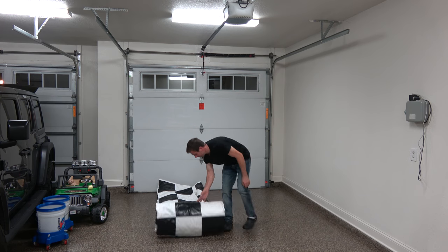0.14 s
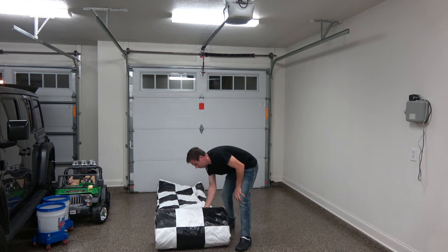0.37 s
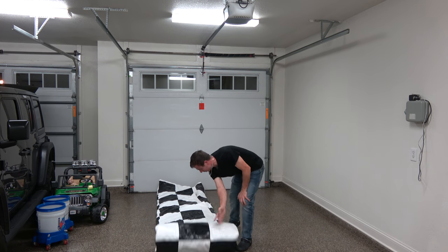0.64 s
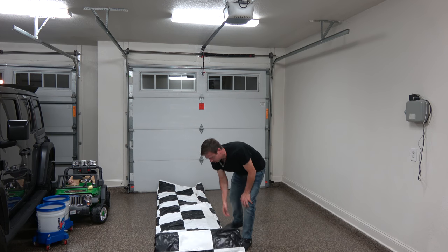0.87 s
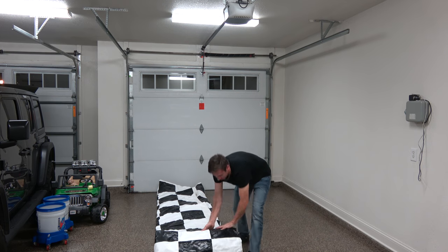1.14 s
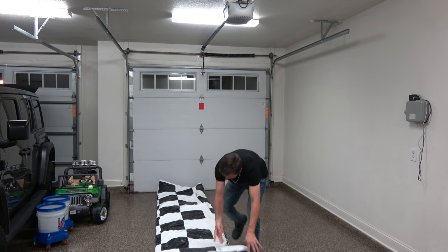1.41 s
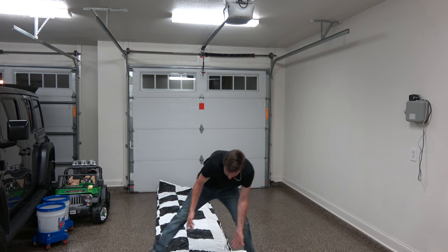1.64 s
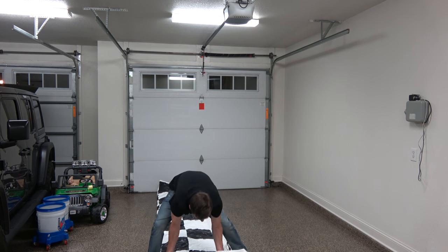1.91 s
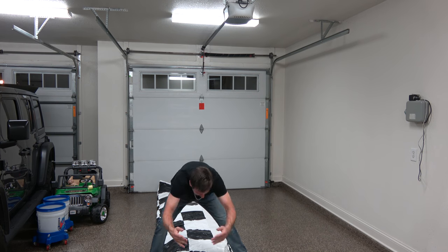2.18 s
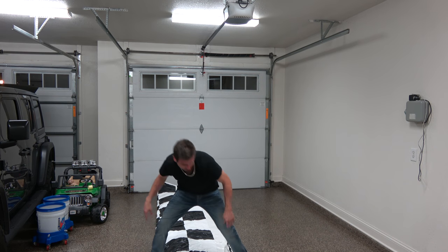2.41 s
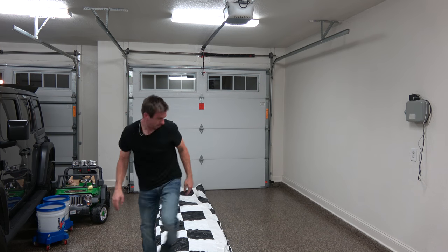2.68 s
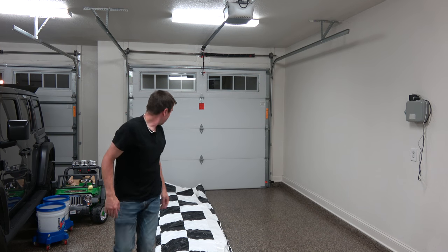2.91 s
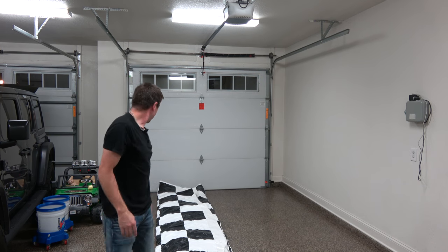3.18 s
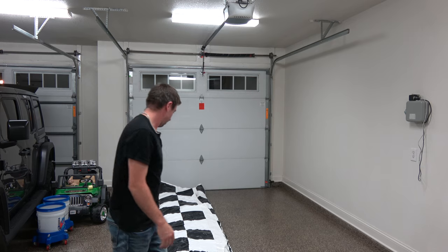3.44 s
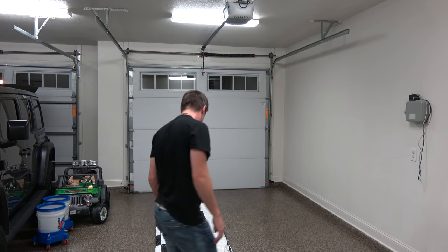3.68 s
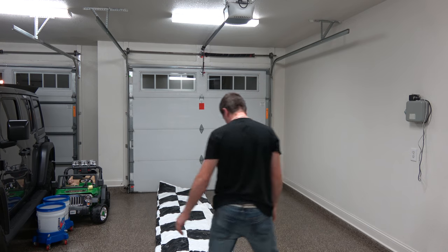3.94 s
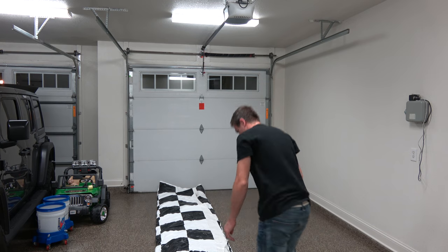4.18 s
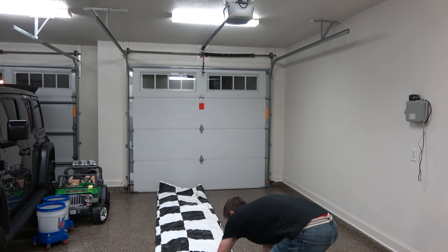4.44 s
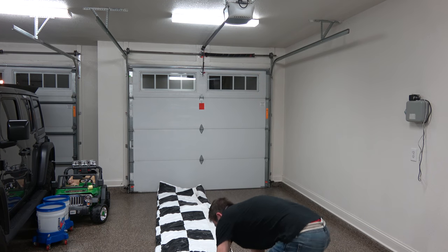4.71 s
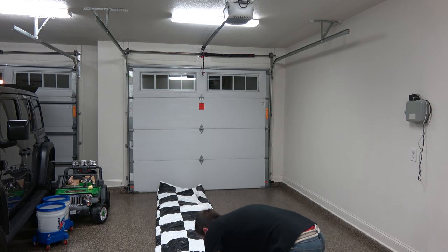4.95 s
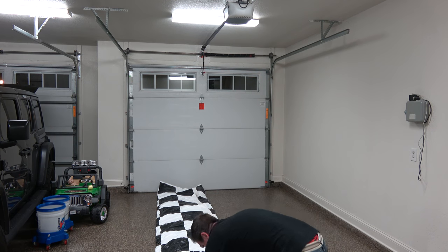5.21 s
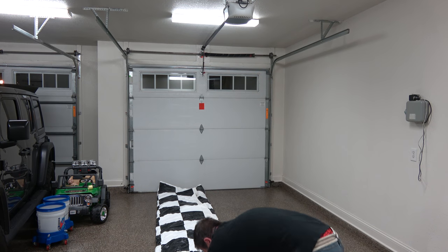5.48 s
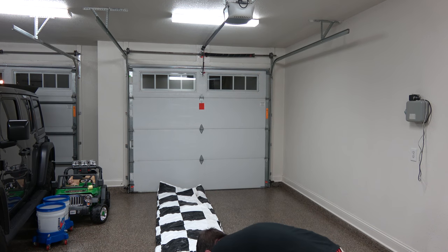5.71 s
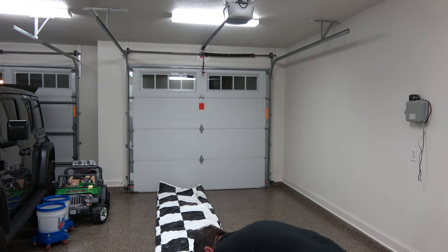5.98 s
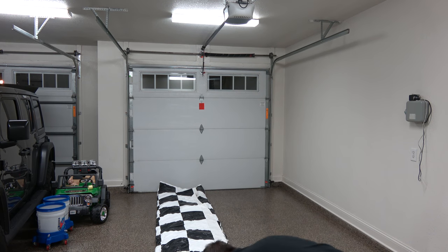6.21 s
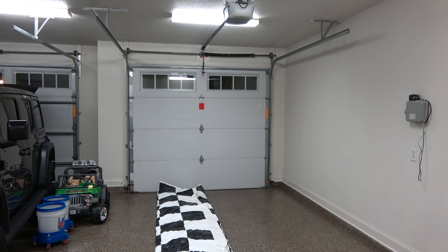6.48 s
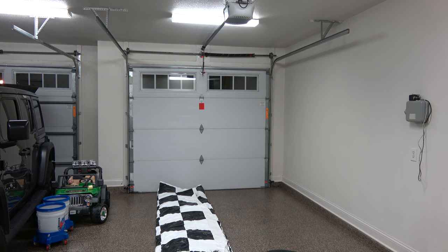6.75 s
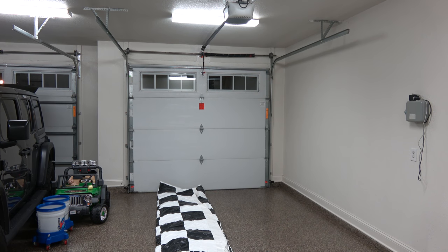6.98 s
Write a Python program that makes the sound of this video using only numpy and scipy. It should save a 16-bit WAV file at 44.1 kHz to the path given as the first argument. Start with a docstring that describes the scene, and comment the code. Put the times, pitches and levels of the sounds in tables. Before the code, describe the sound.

In a bare, reverberant garage, a heavy plastic roll opens in irregular loud bursts of crunch, flapping and crackle. After two seconds it drops to light steps, small ticks and barely audible rustling. Past four seconds the sheet is tugged and straightened closer by, with dense crinkling and even sharper cracks until the cut. A single stationary microphone hears everything centered, over quiet rumble and hiss.

```python
"""A thick folded plastic sheet is unrolled over a concrete garage floor, above a low rumble and a faint hiss.
For two seconds hard pulls buckle big folds with a dull crunch, crackle small creases and snap stiff folds.
Two quieter seconds follow, with shoes thudding, scuffing and ticking; then strong pulls go on to the end.
Crunch and crackle are thousands of short rings; snaps, ticks and thuds are a dying ring with dying noise.
The bare garage answers with fading noise; one microphone hears it all, with a soft ceiling on the peaks."""
import sys
import numpy as np
from scipy import signal
from scipy.fft import rfft, irfft, next_fast_len
from scipy.io import wavfile
from scipy.ndimage import map_coordinates

SR = 44100
rng = np.random.default_rng(int(sys.argv[2]) if len(sys.argv) > 2 else 0)


def volts(x):
    """Linear amplitude factor 10**(x/20) for a level x in dB, scalar or array-like."""
    e = np.asarray(x, float) / 20
    return 10 ** e


def output_pcm(signal):
    """Save a mono or channel-first signal as 16-bit PCM at the path in sys.argv[1].

    Samples are clipped to [-1, 1] before scaling.
    """
    pcm = np.clip(np.atleast_2d(signal).T, -1, 1) * 32767
    wavfile.write(sys.argv[1], SR, np.round(pcm).astype(np.int16))


N = 313806  # length in samples


def unit(x):
    """Scale to rms 1."""
    return x / np.sqrt(np.mean(x ** 2) + 1e-20)


def along(points, hz):
    """Read (Hz, value) points at any frequency, on a log axis."""
    f, v = np.transpose(points)
    return np.interp(np.log(hz + 1e-9), np.log(f), v)


def curves(rows):
    """One value per sample for each column after the time."""
    s, *cols = np.transpose(rows)
    return [np.interp(np.arange(N) / SR, s, c) for c in cols]


def wobble(rate):
    """A smooth random curve through `rate` random points a second (200 at most)."""
    points = rng.standard_normal(int(N * 200 / SR) + 4)
    return map_coordinates(points, [np.arange(N) * rate / SR])


def noise(spectrum):
    """Noise of rms 1 with this spectrum, silent an octave or more outside it."""
    hz = np.fft.rfftfreq(N, 1 / SR)
    inside = (hz > spectrum[0][0] / 2) * (hz < spectrum[-1][0] * 2)
    gain = volts(along(spectrum, hz)) * inside
    return unit(irfft(rfft(rng.standard_normal(N)) * gain, N))


def filtered(x, response):
    """x times a response of frequency."""
    m = next_fast_len(N + SR // 2)
    hz = np.fft.rfftfreq(m, 1 / SR)
    return irfft(rfft(x, m) * response(hz), m)[..., :N]


def resonance(f, hz, width):
    """Response of one thing that likes to ring at hz; a wider resonance dies sooner."""
    return 1j * f * width / (hz * hz - f * f + 1j * f * width)


# How loud the rumble is over time. Each row: time in seconds, level in dB.
RUMBLE_LEVEL = [(0.0, -36), (.4, -48), (.85, -44), (1.2, -46), (1.45, -49), (2.0, -46.5), (2.6, -43),
                (3.35, -48.5), (3.65, -45), (3.9, -50), (4.45, -37.5), (5.0, -46), (5.6, -45), (6.3, -48),
                (6.7, -48), (7.12, -56)]
# Tone of the rumble. Each row: frequency in Hz, relative strength in dB per Hz.
RUMBLE_SPECTRUM = [(20, -0.5), (40, 2), (90, 3.5), (170, -1), (300, -13.5), (500, -19)]
# Tone of the still air and the microphone. Each row: frequency in Hz, relative strength in dB per Hz.
HISS_SPECTRUM = [(200, -0.5), (1000, -9), (3000, -11.5), (6400, -17), (16000, -24)]


def background():
    """Low rumble through the building, slowly wavering, over a faint steady hiss."""
    rumble_db, = curves(RUMBLE_LEVEL)
    rumble = volts(rumble_db + 1.2 * wobble(1.54)) * noise(RUMBLE_SPECTRUM)
    return rumble + volts(-46) * noise(HISS_SPECTRUM)


# Tugs at the sheet and brushes of a shoe against it.
# Each row: start in seconds, rise in seconds, hold in seconds, level in dB, tautness in dB.
TUGS = [(0.0, 0.0017, 0.12, -33, -2), (0.065, 0.068, .06, -27, 1.5), (.15, 0.082, 0.045, -12, -0.5),
        (0.269, 0.025, .04, -14, 0), (0.325, 0.025, 0.12, -21, 0.5), (0.509, 0.024, 0.14, -18.5, -0.5),
        (0.576, 0.027, 0.042, -25.5, 2), (0.632, 0.07, 0.035, -14.5, 0.5), (0.704, 0.052, 0.027, -11, 0),
        (0.793, 0.024, 0.068, -19.5, 1), (.89, .03, 0.065, -26, 1.5), (0.997, 0.026, 0.13, -34, 1.5),
        (1.178, 0.02, 0.047, -26, 2), (1.317, 0.041, 0.11, -25, 0.5), (1.382, 0.039, 0.059, -15, 0),
        (1.448, 0.044, 0.089, -12.5, 0), (1.622, .03, 0.077, -28, 1), (1.736, .015, 0.029, -18, 2),
        (1.947, 0.012, 0.11, -29.5, 0), (2.041, 0.076, .06, -11, 0), (2.154, .03, 0.064, -14, 2),
        (2.3, 0.027, 0.017, -27.5, -7), (2.516, 0.038, 0.044, -40.5, -0.5), (2.66, 0.027, 0.037, -49, -1),
        (2.767, 0.016, 0.079, -44, 3), (2.861, .01, 0.036, -36, 3), (2.97, 0.016, 0.03, -41, 2.5),
        (3.06, 0.016, 0.037, -43, 0), (3.143, .02, 0.042, -41.5, 0), (3.216, .03, 0.086, -39.5, 0.5),
        (3.364, 0.016, 0.064, -42.5, 1.5), (3.555, 0.044, 0.11, -38, 0.5), (3.74, .02, 0.066, -53, -6),
        (3.91, .01, 0.079, -39.5, 1), (4, .003, 0.032, -32.5, 0), (4.203, 0.0074, 0.028, -25, 1),
        (4.24, 0.015, 0.081, -35, 2.5), (4.439, .002, 0.067, -21.5, 2.5), (4.485, 0.052, 0.047, -16.5, 0.5),
        (4.564, .01, 0.065, -12, -1.5), (4.635, 0.032, 0.041, -11.5, -1), (4.79, 0.023, 0.022, -17.5, -4),
        (4.816, 0.014, 0.1, -11.5, 1), (4.906, 0.031, 0.11, -14.5, 1.5), (5.075, 0.039, 0.095, -17, 2),
        (5.238, 0.056, 0.13, -11.5, 1), (5.415, .02, 0.062, -21.5, 6), (5.517, 0.027, 0.077, -28, 2.5),
        (5.633, 0.038, 0.025, -13, 2), (5.687, 0.025, 0.085, -12.5, 1), (5.897, 0.037, 0.032, -11.5, 2),
        (5.963, 0.034, 0.049, -12.5, 2), (6.107, .01, 0.045, -23, 4.5), (6.16, .02, .03, -28, -6),
        (6.242, 0.057, 0.061, -14, 1), (6.363, 0.036, 0.079, -18.5, 1.5), (6.444, .02, .04, -22.5, 5),
        (6.565, .03, 0.03, -20, 0.5), (6.605, 0.056, 0.046, -11.5, 1), (6.787, 0.044, 0.095, -29.5, 0.5),
        (6.915, .04, 0.044, -17, 1.5), (6.975, 0.027, 0.072, -16, 2)]
# How each size follows a tug; the rows are big folds, middle folds, small creases, flap.
# Each row: offset from the tug in dB, dB per dB of tautness, extra dB per second as the tug goes on.
SIZES = [(0, -0.61, -11.5), (-3.5, 0.53, -4), (-8.5, 2.15, 2), (-24.5, 3.5, -15)]
# The whole sheet flaps over. Each row: time of the peak in seconds, peak level in dB.
FLAPS = [(.22, -16), (.47, -22), (.77, -14.5), (1.07, -52), (1.21, -20), (1.51, -24), (2.1, -18),
         (2.25, -19.5), (2.48, -27.5), (2.8, -36), (3.65, -25), (4.02, -31), (4.28, -31), (4.475, -20.5),
         (4.7, -15), (4.84, -18), (5.03, -18.5), (5.27, -31), (5.55, -31), (5.75, -17.5), (5.94, -21),
         (6.28, -37), (6.46, -19), (6.64, -19), (6.96, -22)]


def tugs():
    """Every tug rises, holds and lets go; overlapping tugs add in power. Gives levels and tautness."""
    rise_db = 14  # climb for each tenfold of time in the rise
    let_go_db_per_s, flap_up_db_per_s, flap_down_db_per_s = 225, 320, 303
    power, taut = np.full((len(SIZES), N), 1e-9), np.zeros(N)
    since_start = np.arange(SR // 2) / SR
    offset_db, per_taut, gain_db_per_s = np.transpose(SIZES)[:, :, None]
    for s, rise, hold, db, taut_db in TUGS:
        i = round(s * SR)
        u = since_start[:N - i]
        climb_db = rise_db * np.log10(np.clip(u / (rise + .002), 1e-3, 1))  # every rise is 2 ms longer
        fall_db = let_go_db_per_s * np.clip(u - (rise + hold), 0, None)
        shape_db = db + climb_db - fall_db
        each = volts(shape_db + offset_db + per_taut * taut_db + gain_db_per_s * u) ** 2
        power[:, i:i + len(u)] += each
        taut[i:i + len(u)] += taut_db * each[1]
    t = np.arange(N) / SR
    for s, db in FLAPS:
        away_db = np.maximum(flap_up_db_per_s * (s - t), flap_down_db_per_s * (t - s))
        power[3] += volts(db - away_db) ** 2
    return np.sqrt(power), taut / power[1]  # tautness is averaged by middle-fold power


def buckling(spectrum, count, size, cycles, spread_db, clump_db, pitch_hz=None):
    """Facets of random width flip in or out, each a short ring at its own pitch.

    size is the ring in samples, cycles how many turns it lasts; a positive spread_db makes few large.
    With pitch_hz the spectrum holds multiples of that moving pitch."""
    when, which, big, way = rng.random((4, count))
    start = (when * N).astype(int)
    hz = spectrum[0][0] * (spectrum[-1][0] / spectrum[0][0]) ** which
    size_db = -spread_db * np.log(big + .01)
    level = volts(along(spectrum, hz) + size_db + clump_db[start])
    level = level * hz * np.sign(way - .5)  # high rings are shorter, so they start stronger
    ring_hz = hz if pitch_hz is None else hz * pitch_hz[start]
    turns = ring_hz[:, None] * np.arange(size) / SR
    fade = np.exp(-turns / cycles) * np.hanning(2 * size)[size:]
    rings = level[:, None] * np.sin(2 * np.pi * turns) * fade
    places = start[:, None] + np.arange(size)
    return unit(np.bincount(places.ravel(), rings.ravel())[:N])


# Tone of the big folds. Each row: frequency in Hz, relative strength in dB per Hz.
FOLDS = [(300, -23), (500, -3.5), (700, 0.5), (1200, -0.5), (1800, -4.5), (2500, -14.5)]
# Tone of the middle folds. Each row: multiple of their moving pitch, relative strength in dB per Hz.
MIDDLE = [(.55, -9), (.8, -4.5), (1, -4), (1.3, -6), (1.9, -14.5)]
# Tone of the small creases. Each row: frequency in Hz, relative strength in dB per Hz.
CREASES = [(3500, -4), (5000, -1.5), (8000, -8), (11000, -7.5), (13500, -23), (17000, -12)]
# Tone of the flapping sheet. Each row: frequency in Hz, relative strength in dB per Hz.
FLAP = [(150, -22), (260, 18), (400, 9.5), (600, 7.5)]


def sheet():
    """Four sizes of buckling follow the tugs; one flip sets off others, so all share the same clumps."""
    (fold_gain, middle_gain, crease_gain, flap_gain), taut_db = tugs()
    taut_hz = 2383 + 67 * taut_db  # middle folds ring higher when the sheet is taut
    clump_db = .7 * wobble(40) + 1.6 * wobble(190)
    folds = buckling(FOLDS, count=20000, size=200, cycles=0.9, spread_db=1.5, clump_db=clump_db)
    middle = buckling(MIDDLE, count=30000, size=80, cycles=2.5, spread_db=3.0, clump_db=clump_db,
                      pitch_hz=taut_hz)
    creases = buckling(CREASES, count=60000, size=40, cycles=0.98, spread_db=-2.0, clump_db=clump_db)
    flap = buckling(FLAP, count=6000, size=600, cycles=1.3, spread_db=1.5, clump_db=clump_db)
    return fold_gain * folds + middle_gain * middle + crease_gain * creases + flap_gain * flap


# Stiff folds letting go, and in the quiet middle the scuffs and ticks of shoes on the sheet.
# Each row: time in seconds, crack level in dB, pitch in Hz, rattle level in dB, fizz level in dB.
SNAPS_AND_TICKS = [(.061, -26, 12000, -36, -31), (0.116, -18, 1500, -15, -46), (.154, -20, 12500, -28, -24),
                   (0.176, -5, 2200, -11, -39), (0.198, 0, 1240, -8, -39), (.393, -8, 681, -18, -15.5),
                   (.468, -11, 5970, -27, -34), (0.509, -16, 1400, -12.5, -43),
                   (0.605, -1, 1520, -9.5, -38), (.677, -8, 1480, -9.5, -29),
                   (1.128, -18, 2600, -24.5, -39), (1.187, -19, 397, -21.5, -35),
                   (1.209, -8, 515, -29, -38), (1.406, -8, 1020, -9.5, -38), (1.448, -1, 1380, -15, -32),
                   (1.453, -4, 880, -19, -27), (1.474, -5, 890, -24, -10.5), (1.497, -3, 1280, -9, -20),
                   (1.57, -3, 1840, -20, -35), (1.67, -8.5, 610, -28, -38), (1.753, -4, 1130, -24, -44),
                   (1.776, -10, 7500, -13.5, -28), (2.071, -20, 920, -20, -32), (2.345, -8, 1180, -41, -51),
                   (2.541, -36, 8000, -44, -49), (2.599, -30, 832, -34, -54),
                   (2.691, -27, 1850, -36.5, -58), (2.788, -23, 328, -44, -41),
                   (2.871, -18, 1400, -28.5, -46), (2.883, -11, 1400, -31, -44),
                   (3.085, -27, 800, -37, -56), (3.153, -30, 5200, -37, -48), (3.236, -21, 2620, -35, -41),
                   (3.292, -17, 1420, -40, -49), (3.447, -20, 1380, -31, -56), (3.602, -33, 573, -29, -46),
                   (3.678, -12.5, 1820, -27, -56), (3.916, -33, 730, -30.5, -51),
                   (4.005, -27, 1910, -30, -46), (4.207, -6, 2220, -27, -48), (4.446, -14, 907, -15, -18.5),
                   (4.569, -12, 885, -5.5, -38), (4.825, -21, 856, -6.5, -21), (5.131, -7, 3570, -10, -23),
                   (5.161, 4.5, 2360, -25, -28), (5.269, -11, 804, -17, -19), (5.435, 3, 3200, -7, -20),
                   (5.449, -4, 2920, -9, -23), (5.488, -6, 1320, -11.5, -17), (5.55, -16, 480, -11, -36),
                   (5.564, 0.5, 1050, -15, -33), (5.646, -7.5, 890, -13.5, -17),
                   (5.658, -1, 3060, -12.5, -17), (5.687, -8, 3200, -18, -26), (5.919, -1, 1440, -12, -28),
                   (6.102, 0, 686, -20, -15), (6.107, 10, 3150, -9.5, -18), (6.139, -11, 660, -17, -19),
                   (6.175, 0, 1970, -18, -24), (6.482, -10, 6500, -10, -26), (6.494, -12, 7960, -16, -30),
                   (6.549, -1, 1450, -24, -22), (6.577, -7, 694, -18, -34), (6.627, -9, 1370, -23, -17),
                   (6.938, -14, 1130, -19.5, -27), (6.958, -8, 4500, -17, -30)]
# Tone of the fizz on top of each. Each row: frequency in Hz, relative strength in dB per Hz.
FIZZ = [(3500, -7), (5000, 0), (9000, -4), (13000, -12), (17000, -14)]


def snaps_and_ticks():
    """A fold or a shoe cracks in one short ring; a dying rattle follows around that pitch, with a fizz on top."""
    rattle_t60_s, fizz_t60_s, attack_s = 0.095, 0.074, .001  # t60: time to fade by 60 dB
    out, t = np.zeros(N + SR), np.arange(SR // 4) / SR
    f = np.fft.rfftfreq(len(t), 1 / SR)
    for s, crack_db, hz, rattle_db, fizz_db in SNAPS_AND_TICKS:
        white = rfft(rng.standard_normal((2, len(t))))
        rattle = unit(irfft(white[0] * resonance(f, hz, 0.7 * hz + 300) ** 2, len(t)))
        fizz = unit(irfft(white[1] * volts(along(FIZZ, f)) * (f > FIZZ[0][0]), len(t)))
        crack = np.sin(2 * np.pi * hz * t) * np.exp(-hz * t / 1.2)
        dying_rattle = volts(rattle_db - 60 * t / rattle_t60_s) * rattle
        dying_fizz = volts(fizz_db - 60 * t / fizz_t60_s) * fizz
        followers = (1 - np.exp(-t / attack_s)) * (dying_rattle + dying_fizz)
        out[round(s * SR):][:len(t)] += volts(crack_db) * crack + followers
    return out[:N]


# Shoes and the roll landing on concrete.
# Each row: time in seconds, relative level in dB, pitch in Hz that the sinking push is reckoned from.
THUDS = [(0.09, -27, 144), (0.741, -23, 147.5), (1.045, -24, 73.3), (1.751, -23.5, 112), (2.432, -18, 151),
         (2.687, -37, 125), (2.773, -32, 208), (3.0, -34, 118), (3.039, -26.5, 72), (3.111, -34, 44.6),
         (3.584, -37, 153), (3.623, -17.5, 93.5), (3.631, -32, 265), (3.671, -23, 64.6), (3.799, -29.5, 44),
         (4.029, -36, 41), (4.298, -33, 83), (4.447, -27, 165), (5.53, -33, 46), (6.017, -27.5, 170),
         (6.25, -24.5, 74.4), (6.9, -39, 85), (7.039, -31, 75), (7.071, -21, 130), (7.09, -24, 107)]
# Standing waves of the garage. Each row: frequency in Hz, width in Hz, relative level in dB.
AIR_MODES = [(35.7, 4.5, 9), (53.2, 5.8, 4), (92.6, 5.7, -12), (120.6, 6.5, 1.5), (149, 8, -3),
             (265, 7.7, -9)]


def thuds():
    """A soft blow on concrete: a sinking low push and a dull puff set the garage's standing waves humming."""
    thud_t60_s, attack_s = 0.29, 0.0023
    out, t = np.zeros(N + SR), np.arange(SR // 2) / SR
    f = np.fft.rfftfreq(len(t), 1 / SR)
    for s, db, hz in THUDS:
        # the pitch sinks from 1.09 to 0.75 times hz
        turns = hz * (.75 * t + 0.296 * 0.068 * (1 - np.exp(-t / 0.06)))
        white = rfft(rng.standard_normal(len(t)))
        puff = unit(irfft(white * resonance(f, 1.07 * hz, 1.4 * hz) ** 2, len(t)))
        push = np.sin(2 * np.pi * turns)
        blow = push + volts(-60 * t / 0.42) * puff  # the puff dies sooner than the push
        level = volts(db - 9.5 - 60 * t / thud_t60_s) * (1 - np.exp(-t / attack_s))
        out[round(s * SR):][:len(t)] += level * blow
    blows = out[:N]
    hum = filtered(blows, lambda f: sum(volts(db) * resonance(f, hz, w) for hz, w, db in AIR_MODES))
    return blows + volts(6.0) * hum


# How long the garage rings on. Each row: frequency in Hz, time to fade by 60 dB in seconds.
GARAGE = [(100, 0.06), (400, 0.32), (2000, 0.52), (6000, 0.6), (14000, 0.47)]


def garage(x, size=SR // 32):
    """Bare walls answer with noise: each frequency dies at its own speed, in a new pattern for each block."""
    out, fade = np.zeros(N + 2 * SR), np.hanning(2 * size)
    x = np.pad(x, (size, 2 * size))
    for i in range(0, N + size, size):
        hz, t, z = signal.stft(rng.standard_normal(SR // 2), SR, nperseg=256)
        dying = z * volts(-60 * t / along(GARAGE, hz)[:, None])
        tail = signal.istft(dying, SR, nperseg=256)[1]
        answer = signal.fftconvolve(x[i:i + 2 * size] * fade, tail / np.linalg.norm(tail))
        out[i:i + len(answer)] += answer
    return out[size - 150:][:N]  # 150 samples late: the first wall is a metre of path away


def scene():
    """The sheet and the shoes in the garage, the same in both channels."""
    # a thin sheet moves no bass, so it is thinned out below 150 Hz
    near = volts(-3) * filtered(sheet() + snaps_and_ticks(), lambda f: (1j * f / (150 + 1j * f)) ** 4)
    low = thuds()
    echo = garage(volts(-1.5) * near + volts(-13) * low)
    mono = near + low + echo + background()
    return np.array([mono, mono])


def band_limit(x):
    """A steep low-pass at the top of the band."""
    return signal.sosfilt(signal.butter(12, 16960, fs=SR, output="sos"), x)


def record(dry):
    """Peaks bend softly under full scale; everything from 15830 Hz up is cut away."""
    held = dry / (1 + np.abs(dry) ** 6) ** (1 / 6)
    mix = filtered(held, lambda hz: hz < 15830)
    return band_limit(mix)


dry = scene()
out = record(dry)
output_pcm(out)
```